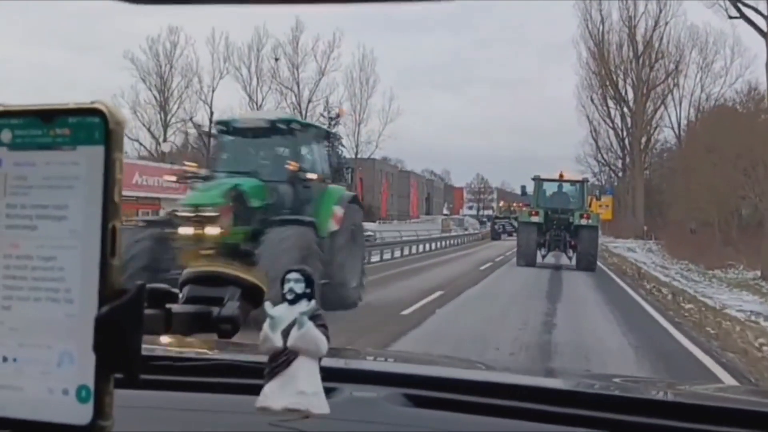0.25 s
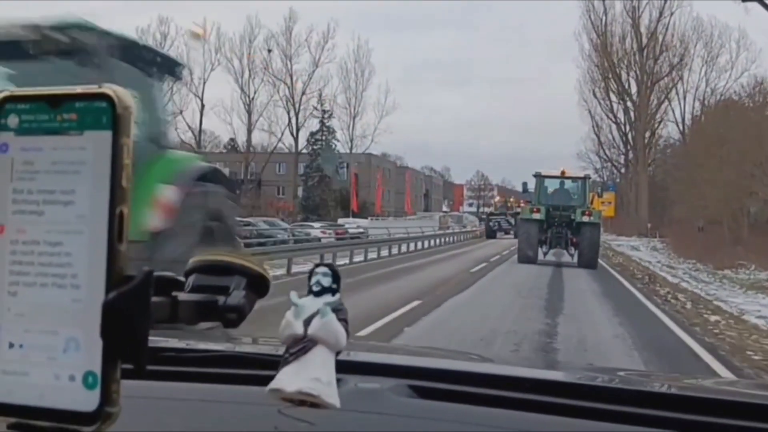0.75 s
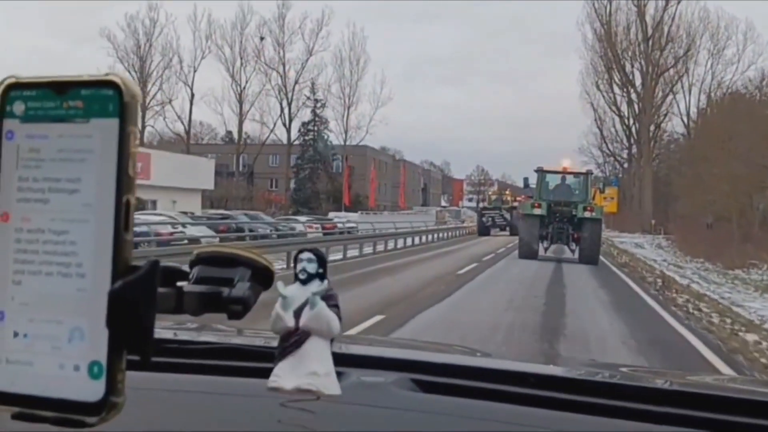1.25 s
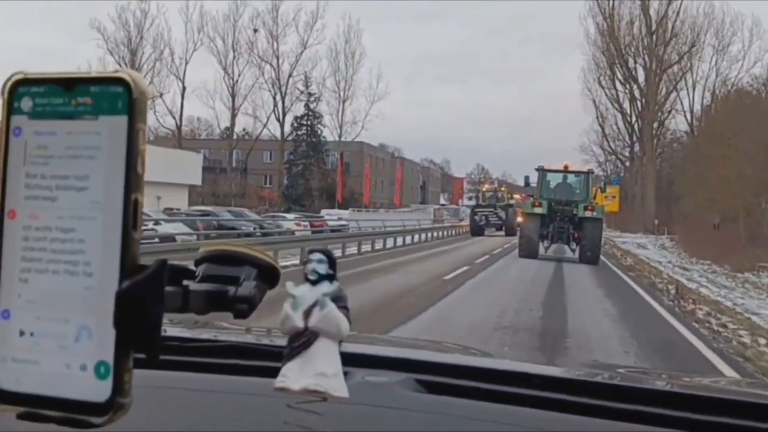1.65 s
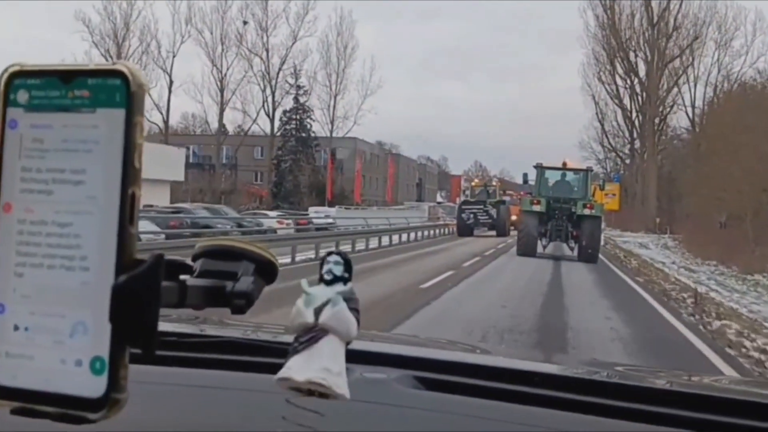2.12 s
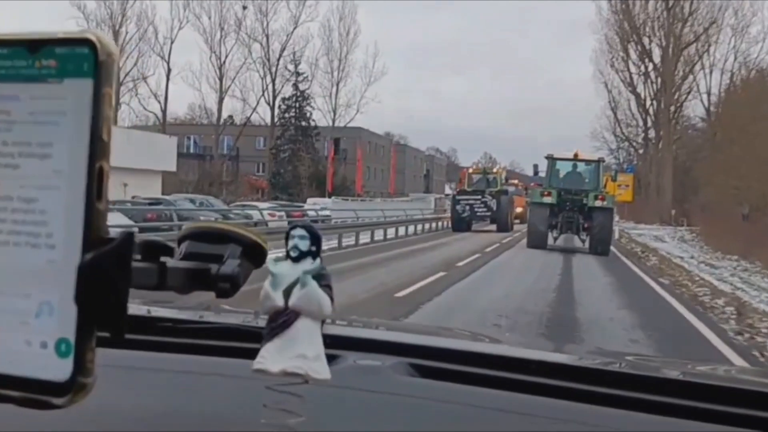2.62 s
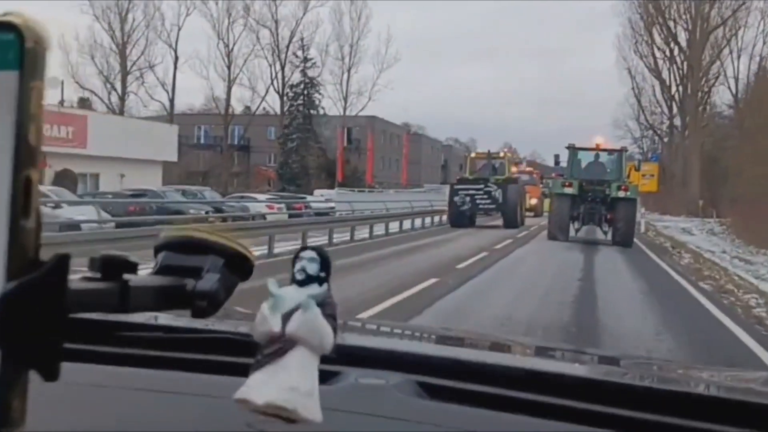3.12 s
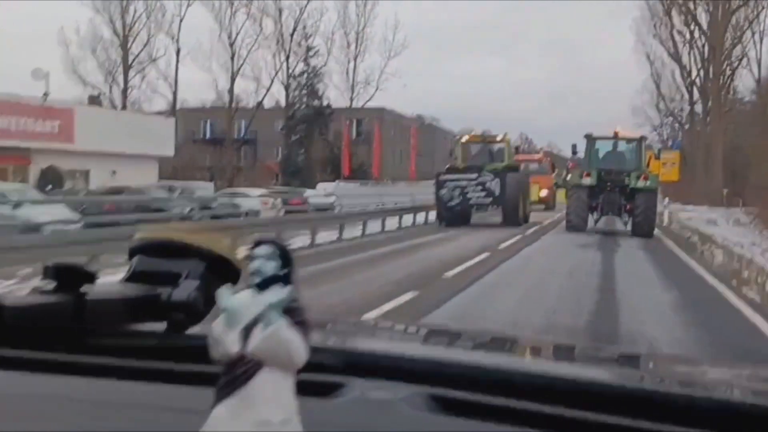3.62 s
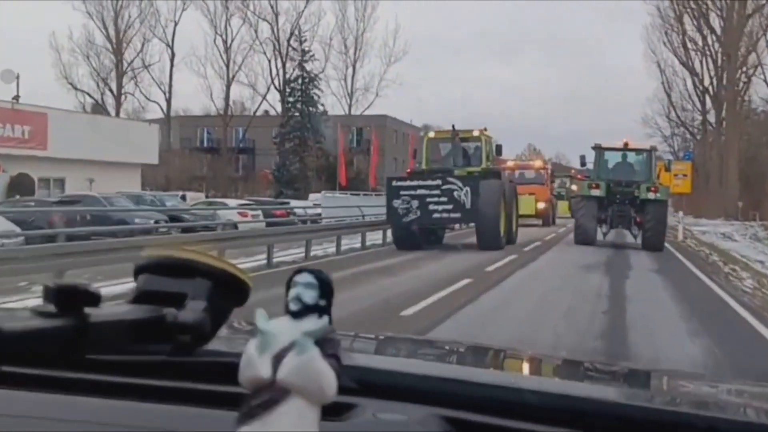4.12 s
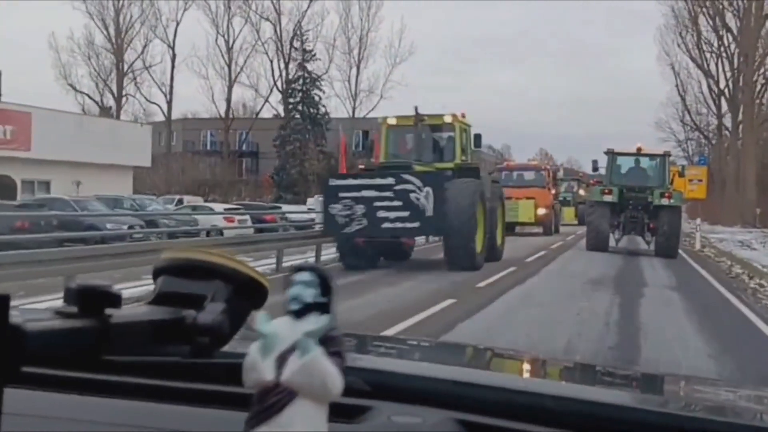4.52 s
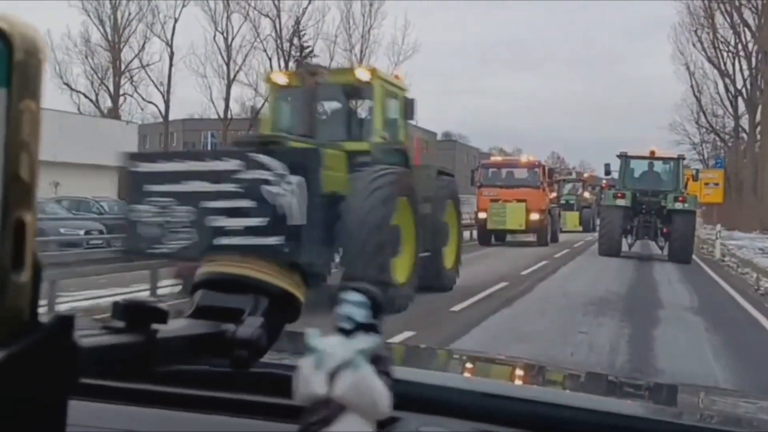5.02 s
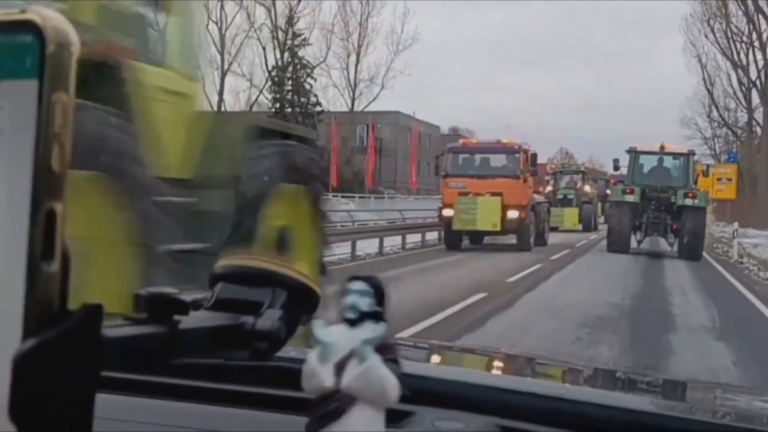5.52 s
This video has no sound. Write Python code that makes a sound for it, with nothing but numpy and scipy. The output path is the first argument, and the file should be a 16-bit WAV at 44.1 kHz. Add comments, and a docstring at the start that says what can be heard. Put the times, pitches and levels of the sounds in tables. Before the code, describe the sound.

The microphone sits inside a slow car on a town road. Throughout, a very deep engine boom throbs and creeps slightly upward, with dark road rumble, faint hiss and an uneven tyre hum pulsing about twice a second. A very faint falling whistle and tiny high squeaks open the clip. At about 0.6 s the driver presses the horn: one continuous, reedy, mid-pitched blast, held almost constant until 3.7 s. Its treble shimmers, dulling around 1.5 and 2.5 s, and a blurred, slightly sharper echo comes back from ahead. A tractor's airy roar peaks around 0.9-1.5 s, with a faint trim buzz near 0.8-1.3 s. A small tick falls at 3.5 s. The horn stops abruptly, its echo fading within a fraction of a second. Low rumble remains; engine and tyre hum grow from 4.5 s, with small high squeaks, and another tractor passes from 5 s with rough growl and faint gear whine.

```python
"""Inside a slow car on a town road: the engine booms and throbs, the tyres hum and rumble, tractors pass.
Engine and tyre tones are wavering sine waves; road and traffic are shaped noise, with short high tones, a tick
and a rattle. The driver holds the horn for three seconds: a stack of overtones reaches the cabin directly,
fading in and out. It also comes back from things ahead as a smeared echo, raised in pitch because the car is
closing on them."""
import sys
import numpy as np
from scipy import signal
from scipy.io import wavfile
from scipy.ndimage import uniform_filter1d

SR = 44100
rng = np.random.default_rng(int(sys.argv[2]) if len(sys.argv) > 2 else 0)


def put_to_file(sound):
    """Save the sound as 16-bit audio at rate SR, in the file named by the first command-line argument."""
    columns = np.atleast_2d(sound).T  # one column per channel
    safe = np.clip(columns, -1, 1)
    whole_steps = np.round(safe * 32767)
    wavfile.write(sys.argv[1], SR, whole_steps.astype(np.int16))


N = 253575

HORN_ON_S, HORN_OFF_S = 0.563, 3.707
HORN_HZ, HORN_RISE_HZ_PER_S = 305.95, .15


def from_db(db):
    """Turn decibels into a multiplier for the wave."""
    return 10 ** (np.asarray(db) / 20)


def rms_one(x):
    """Scale a signal so that its average strength (rms) is 1."""
    return x / np.sqrt(np.mean(x ** 2) + 1e-20)


def in_time(rows):
    """Join the points of a table by straight lines: one value a sample for each column after the time."""
    s, *columns = np.transpose(rows)
    return [np.interp(np.arange(N) / SR, s, c) for c in columns]


def at_hz(points, hz):
    """Read a table of (pitch, value) at any pitch, on a logarithmic pitch axis."""
    table_hz, values = np.array(points).T
    return np.interp(np.log(hz), np.log(table_hz), values)


def drift(rate):
    """Slow random wandering of spread 1: coarse noise smoothed twice; a higher rate in Hz wanders faster."""
    r = np.exp(-128 * np.pi * rate / SR)  # one coarse step is 64 samples
    noise = rng.standard_normal(N // 64 + 1002)
    slow = signal.lfilter([1], [1, -2 * r, r * r], noise)[1000:]
    return np.interp(np.arange(N) / 64, np.arange(len(slow)), rms_one(slow - slow.mean()))


def turns(hz):
    """Add up a pitch curve into the running angle of its wave, in radians."""
    return 2 * np.pi * np.cumsum(hz) / SR


def gate(on, off, rise, fall):
    """Switch a sound on and off with a straight rise and fall, all in seconds."""
    return np.interp(np.arange(N) / SR, [on, on + rise, off, off + fall], [0, 1, 1, 0])


def smooth_patches(shape, steps):
    """Random patches of spread 1 over pitch and time: noise averaged over 5 pitch bins and some time steps."""
    patches = uniform_filter1d(rng.standard_normal(shape), size=5, axis=-2)
    return rms_one(uniform_filter1d(patches, size=steps, axis=-1))


def coloured_noise(spectrum, patchy_db):
    """Stereo noise of rms 1 shaped over pitch, while narrow patches of it murmur up and down."""
    # how alike the two sides are: pitch_hz, likeness (0 to 1)
    likeness = [(40, 0.86), (130, 0.73), (300, 0.89), (700, 0.45), (2000, 0.19), (9000, 0.06)]
    # balance of the two sides: pitch_hz, left_minus_right_db
    lean = [(60, -6.5), (110, 4.5), (190, 3), (340, -0.5), (610, -3.5), (1090, 2), (1940, 6), (3460, 2),
            (6170, 7.5), (11000, -1)]
    noise = rng.standard_normal((2, N + 4096))
    hz, _, (mid, side) = signal.stft(noise, SR, nperseg=2048, noverlap=1536)
    hz = np.maximum(hz, 1)[:, None]
    patches = smooth_patches(mid.shape, 6)
    alike, lean_db = np.clip(at_hz(likeness, hz), 0, 1), at_hz(lean, hz) / 2
    common, apart = np.sqrt(1 + alike) * mid, np.sqrt(1 - alike) * side
    left = (common + apart) * from_db(lean_db)
    right = (common - apart) * from_db(-lean_db)
    gain = from_db(at_hz(spectrum, hz) + patchy_db * np.clip(patches, -3, 2.3))
    sound = signal.istft(gain * np.array([left, right]), SR, nperseg=2048, noverlap=1536)[1]
    return rms_one(sound[:, 2048:N + 2048])


def hum(rows, waver_db, waver_rad):
    """A sine wave on a pitch and level curve, unsteady in level and phase."""
    hz, level_db = in_time(rows)
    level = np.sqrt(2) * from_db(level_db + waver_db * drift(0.98))
    return level * np.sin(turns(hz) + waver_rad * drift(1.46))


def engine():
    """Boom at the firing rate, a tone at twice that rate, and a fading drone that beats with the boom."""
    # boom of the firing cylinders: start_s, firing_pitch_hz, level_db
    boom_curve = [(0, 36.4, -22), (.5, 37.2, -21.5), (1, 37.7, -21.5), (2.2, 38, -20.5), (3.7, 38.3, -19.5),
                  (4.2, 38.8, -18.5), (4.45, 39, -20), (4.85, 39.2, -17), (5.05, 39.3, -19),
                  (5.4, 39.6, -16.5), (5.75, 40, -18)]
    second_db = -31.5
    drone_hz, drone_db = 43.17, -28.5
    fade_start_s, fade_db_per_s = 1.3, 13
    in_step_s = 1.19  # a moment when boom and drone add up
    hz, boom_db = in_time(boom_curve)
    firing, t = turns(hz), np.arange(N) / SR
    boom = from_db(boom_db + 0.59 * drift(1.0)) * np.sin(firing)
    second = from_db(second_db + 1.9 * drift(6.4)) * np.sin(2 * firing + 0.47 * drift(1.0))
    fading_db = drone_db - fade_db_per_s * np.maximum(t - fade_start_s, 0)
    drone_phase = firing[round(in_step_s * SR)] + 2 * np.pi * drone_hz * (t - in_step_s)
    drone = from_db(fading_db) * np.sin(drone_phase)
    return np.sqrt(2) * (boom + second + drone)


def body_hum():
    """A low, wavering hum of the car body, as one unsteady sine wave."""
    # start_s, pitch_hz, level_db before its wavering
    hum_curve = [(0, 63.5, -52), (1.2, 62, -32), (2.7, 62.38, -39), (3.6, 61.93, -39), (4.3, 62.5, -39.5),
                 (4.8, 61.65, -28), (5.75, 56.2, -45)]
    return hum(hum_curve, 6.5, 0.9)


def tyre():
    """An uneven hum that swells once a beat; the beat slows a little."""
    # start_s, pitch_hz, level_db before the beat
    tyre_curve = [(0, 163, -29), (.9, 159.9, -36), (1.6, 149.9, -32), (2.4, 143.3, -31.5),
                  (3.4, 134.8, -30.5), (4.2, 131.8, -29.5), (4.7, 129, -26), (5.1, 129.5, -25),
                  (5.75, 129.7, -32)]
    beat_s, beat_depth, loud_s = .44, 0.41, 4.62  # loud_s is one of the loud moments
    slowing = .02  # beats per second squared
    t = np.arange(N) / SR - loud_s
    beat = 1 + beat_depth * np.cos(2 * np.pi * (t / beat_s - slowing * t ** 2))
    return hum(tyre_curve, 1.5, 1) * beat * (1 + .4 * drift(10))


def road():
    """Low rumble and fainter hiss of the road, both as shaped noise."""
    # colour of the rumble: pitch_hz, relative_level_db
    rumble_colour = [(20, -37), (32, -2), (52, -6.5), (66, -18), (95, -2), (120, -12.5), (135, 0),
                     (172, -3), (195, -12.5), (245, -20), (345, -24.5), (500, -48.5), (700, -85)]
    # loudness of the rumble: start_s, level_db
    rumble_level = [(0, -27), (1, -26), (2, -26), (3.5, -26.5), (4.6, -27), (5.75, -25)]
    # colour of the hiss: pitch_hz, relative_level_db
    hiss_colour = [(150, -21.5), (250, -11.5), (344, 1), (373, -10.5), (506, -13.5), (565, -22.5),
                   (857, -25.5), (929, -13), (1260, -38.5), (1680, -38), (3080, -45), (3680, -39),
                   (4320, -54), (7800, -45.5), (11500, -58.5), (13000, -63.5), (15500, -70.5),
                   (22000, -120)]
    hiss_db = -44
    rumble_db = in_time(rumble_level)[0] + 1.0 * drift(3.3)
    rumble = from_db(rumble_db) * coloured_noise(rumble_colour, patchy_db=-0.5)
    return rumble + from_db(hiss_db) * coloured_noise(hiss_colour, patchy_db=3.5)


def tractors():
    """Tractors passing: a roar of shaped noise, a whine of gear noise and a rough growling band."""
    # colour of the roar: pitch_hz, relative_level_db
    roar_colour = [(180, -37), (300, -14), (336, -14.5), (393, -4.5), (656, -11.5), (937, -16.5),
                   (1540, -23), (1730, -23.5), (3100, -37), (3420, -35.5), (4400, -41.5), (9000, -51),
                   (11700, -80.5), (19800, -120)]
    # loudness of the roar: start_s, level_db
    passing = [(0, -48), (.25, -47), (.5, -49), (.9, -41), (1.2, -41.5), (1.55, -42.5), (2, -51.5),
               (4.98, -56), (5.1, -47.5), (5.3, -48.5), (5.45, -49), (5.58, -43), (5.75, -44)]
    # gear whine: start_s, pitch_hz, level_db
    whine_curve = [(5.02, 1685, -80), (5.07, 1690, -60), (5.15, 1700, -69), (5.27, 1720, -58),
                   (5.35, 1730, -72.5), (5.48, 1745, -77), (5.55, 1765, -60), (5.68, 1765, -69),
                   (5.75, 1765, -75)]
    # rough band in the roar: start_s, pitch_hz, level_db
    growl_curve = [(4.8, 965, -79), (4.88, 930, -58.5), (4.97, 904, -71), (5.1, 1010, -58.5),
                   (5.28, 903, -71), (5.36, 856, -52), (5.45, 900, -52), (5.53, 930, -47), (5.62, 896, -51),
                   (5.7, 952, -58), (5.75, 970, -64)]
    # fast drift roughens each sine wave into a narrow band of noise
    whine = hum(whine_curve, 3, 0) * drift(40)
    growl = hum(growl_curve, 3, 0) * drift(60)
    growl *= np.arange(N) > growl_curve[0][0] * SR  # silent before its first row
    roar_db = in_time(passing)[0] + 1.4 * drift(11)
    return whine + growl + from_db(roar_db) * coloured_noise(roar_colour, patchy_db=5.5)


def whistle():
    """A faint falling whistle, stronger on the left: a sine wave roughened by drift."""
    # start_s, pitch_hz, level_db midway between the sides
    whistle_curve = [(0, 3430, -69), (.2, 3365, -70), (.24, 3350, -90)]
    return hum(whistle_curve, 1.5, .3) * drift(12) * from_db([[4], [-4]])


def short_tones():
    """Short high tones that start softly and die away: sine waves with a falling level."""
    # start_s, level_db from which it dies away, pitch_hz
    tone_list = [(.258, -62, 5850), (0.506, -60, 5950), (4.482, -56, 3613), (4.753, -57, 3620),
                 (5.111, -56, 3637), (5.147, -58, 3790), (5.21, -56, 3900), (5.418, -60, 3806)]
    fall_60_db_s = 0.091
    out = np.zeros(N)
    for s, peak_db, hz in tone_list:
        start = round(s * SR)
        age = np.arange(min(SR // 4, N - start)) / SR
        level = from_db(peak_db - 60 * age / fall_60_db_s) * (1 - np.exp(-age / 0.0013))
        out[start:][:len(age)] += level * np.sin(2 * np.pi * hz * age)
    return out


def horn_pitch():
    """The horn creeps up in pitch while it is held."""
    return HORN_HZ + HORN_RISE_HZ_PER_S * (np.arange(N) / SR - HORN_ON_S)


def swelling_db(hz):
    """Level change in time of the overtone at hz, left and right: the treble level plus nearby swells."""
    # level of the horn's treble: start_s, level_db
    treble_level = [(.6, 2), (.8, 1), (1.1, -3.5), (1.48, -8), (1.8, 3.5), (1.95, 7.5), (2.18, 9),
                    (2.48, -15), (2.85, -.5), (3.1, 4), (3.35, 0), (3.6, 5.5), (3.72, 8)]
    # narrow swells and dips: middle_s, half_length_s, centre_hz, half_width_octaves, left_db, right_db
    swells = [(0.7, 0.2, 3060, 0.02, -9, -11), (0.8, 0.2, 1224, 0.02, -4, 9),
              (0.9, 0.13, 612, 0.02, -9, -2), (0.9, 0.13, 918, 0.02, -9, 7), (0.9, 0.45, 3977, 0.14, 5, -8),
              (0.9, 0.45, 4589, 0.02, 5, 1), (0.95, 0.45, 5813, 0.14, 15, 12),
              (1.1, 0.13, 3671, 0.02, -11, -7), (1.25, 0.08, 4589, 0.14, 7, 9),
              (1.25, 0.2, 2142, 0.14, 0, -13), (1.3, 0.2, 1836, 0.02, -13, 14),
              (1.35, 0.3, 612, 0.02, -10, -10), (1.5, 0.13, 4589, 0.14, -10, -10),
              (1.6, 0.08, 918, 0.02, -9, -7), (1.65, 0.08, 612, 0.14, -14, -2),
              (1.65, 0.45, 7037, 0.07, -14, -4), (1.85, 0.08, 2754, 0.02, -12, -8),
              (1.85, 0.13, 918, 0.14, -7, 2), (1.92, 0.2, 3365, 0.02, 5, 6), (2.0, 0.13, 6119, 0.14, 9, 8),
              (2.0, 0.45, 5201, 0.02, -6, -13), (2.05, 0.13, 9178, 0.14, -15, -12),
              (2.05, 0.2, 3671, 0.02, -19, -13), (2.05, 0.3, 1836, 0.14, 11, 12),
              (2.1, 0.08, 7649, 0.14, -19, -11), (2.1, 0.2, 3060, 0.02, -25, -10),
              (2.3, 0.08, 8567, 0.14, 14, 15), (2.35, 0.2, 1224, 0.02, -13, -9),
              (2.38, 0.08, 4589, 0.14, -9, -8), (2.4, 0.3, 918, 0.14, 3, -14),
              (2.5, 0.3, 2142, 0.14, 11, 13), (2.7, 0.13, 1836, 0.14, 2, 13),
              (2.85, 0.13, 2754, 0.14, -10, 9), (2.95, 0.13, 1224, 0.02, 5, -10),
              (3.0, 0.3, 3365, 0.02, -11, -8), (3.05, 0.08, 4895, 0.02, -16, 5),
              (3.05, 0.08, 5201, 0.14, 13, 12), (3.05, 0.13, 4283, 0.14, -14, 5),
              (3.15, 0.13, 3977, 0.02, -1, -16), (3.2, 0.13, 2142, 0.02, -15, -10),
              (3.2, 0.2, 1224, 0.02, 8, 5), (3.2, 0.2, 1530, 0.02, -13, 1), (3.2, 0.2, 7343, 0.14, -9, -9),
              (3.4, 0.13, 5201, 0.07, -14, -2), (3.4, 0.45, 4589, 0.07, -11, -11),
              (3.45, 0.13, 3060, 0.02, -9, -13), (3.45, 0.3, 918, 0.02, -17, 9),
              (3.55, 0.08, 3977, 0.02, -12, -16), (3.55, 0.13, 2754, 0.14, -15, -14),
              (3.65, 0.13, 5201, 0.02, -3, 14), (3.65, 0.2, 5507, 0.02, 16, -8)]
    treble_from_hz, treble_full_hz = 2000, 2600
    low_overtones_db = .5
    bright = np.clip((hz - treble_from_hz) / (treble_full_hz - treble_from_hz), 0, 1)
    t = np.arange(0, N + 256, 256) / SR
    bumps = np.zeros((2, len(t)))
    for s, half, centre, octaves, *sides_db in swells:
        bump = np.exp(-((t - s) / half) ** 2 - (np.log2(hz / centre) / octaves) ** 2)
        bumps += np.outer(sides_db, bump)
    overall_db = bright * in_time(treble_level)[0] + (1 - bright) * low_overtones_db
    return [overall_db + np.interp(np.arange(N) / SR, t, side) for side in bumps]


def horn():
    """A pulse train built from its overtones; each reaches each side by its own slowly changing path."""
    # overtones from the second up: left_db, right_db, left_lead_radians (levels before fading and swells)
    overtones = [(-44, -45, -2.3), (-39, -51, 2.8), (-50, -56, 1.2), (-49, -60, -0.5), (-66, -68, -0.3),
                 (-59, -60, 0.0), (-60, -64, 0.7), (-57, -67, 3.0), (-55, -64, -2.1), (-59, -60, -0.0),
                 (-61, -61, 1.8), (-60, -59, -2.2), (-59, -62, 2.2), (-60, -63, 1.2), (-65, -70, -2.3),
                 (-61, -69, 1.0), (-78, -77, -0.4), (-77, -84, 2.5), (-78, -88, 0.0), (-83, -97, 2.9),
                 (-77, -94, -0.3), (-73, -94, 2.1), (-66, -84, -2.2), (-63, -88, 1.2), (-66, -91, 2.6),
                 (-69, -91, -3.1), (-74, -88, -0.1), (-79, -88, 1.8), (-82, -88, -0.8), (-89, -85, -1.9),
                 (-94, -81, 0.2)]
    fade_limit_db, flutter_limit_db = 1.5, 4  # greatest spread of the slow fading and of the fast flutter
    release_s, stops_early_s = 0.012, 0.00065  # higher overtones tend to let go sooner
    phase, out = turns(horn_pitch()), np.zeros((2, N))
    for k, (left_db, right_db, lead) in enumerate(overtones, start=2):
        group_db = swelling_db(k * HORN_HZ)
        shared = k * phase + rng.normal(0, 0.95) + 0.43 * drift(3.4)
        # short waves fade and flutter more deeply
        fade_db = np.clip(.4 * (k - 3), .5, fade_limit_db) * drift(2.5)
        rise_s = .1 if 5 < k < 23 else .03  # the middle overtones bloom late
        off_s = HORN_OFF_S - stops_early_s * k * rng.exponential()
        blown = gate(HORN_ON_S, off_s, rise_s, release_s)
        for ch, (side_db, side_rad) in enumerate([(left_db, lead), (right_db, 0)]):
            flutter_db = min(.3 * k, flutter_limit_db) * np.clip(drift(14), -3, 1.5)
            wander = min(.05 * k, .5) * drift(1.5)
            level = from_db(side_db + group_db[ch] + fade_db + flutter_db)
            out[ch] += blown * level * np.sin(shared + side_rad + wander)
    return np.sqrt(2) * out


def patchy(x, patchy_db):
    """Narrow regions of a stereo sound swell and dip briefly, on each side by themselves."""
    spectra = signal.stft(x, SR, nperseg=1024)[2]
    patches = smooth_patches(spectra.shape, 8)
    gain = from_db(patchy_db * (np.minimum(patches, 1.6) - 1))
    return signal.istft(spectra * gain, SR, nperseg=1024)[1][:, :N]


def echo(count=14):
    """Reflectors at many ranges and bearings each return the horn late, raised by twice the closing speed."""
    # start_s, closing_speed_m_per_s, level_db common to all reflectors, extra_treble_db
    echo_curve = [(.6, 5, -59.5, -7), (1.15, 4.9, -64.5, -3.5), (1.8, 4.48, -58.5, -18.5),
                  (2.25, 4.52, -59.5, -13), (2.58, 4.55, -59, -12.5), (2.75, 4.3, -57.5, -5),
                  (3.05, 3.77, -59, -2.5), (3.7, 3.07, -54.5, -5.5), (3.85, 3.4, -69.5, -0.5),
                  (3.93, 4.55, -66.5, 0.5), (4.1, 4.3, -63, -6)]
    # strength of the horn's overtones in the echo: pitch_hz, level_db
    echo_colour = [(600, 3.5), (930, -4), (1250, -2), (1570, -3.5), (1890, -17.5), (2200, -3.5), (3100, -6),
                   (4300, -7.5), (5300, -15.5), (6400, -23), (8000, -10.5), (10000, -25.5)]
    # added for the far reflectors: pitch_hz, extra_db
    far_colour = [(600, 0), (930, 10.5), (1600, 8), (2300, 0), (5500, 1.5), (7000, 13.5), (10000, 7.5)]
    sound_speed = 343  # metres per second
    loss_db_per_s = 14  # later echoes come from farther away and are weaker
    middle_db, middle_follows = 1.5, 0.35  # the middle overtones follow a share of the treble
    speed, level_db, treble_db = in_time(echo_curve)
    pitch, out = horn_pitch(), np.zeros((2, N))
    k, cycle = np.arange(2, 38)[:, None], np.linspace(0, 2 * np.pi, 2049)
    hz = k * pitch.mean()
    middle_gain = from_db(middle_db + middle_follows * treble_db)
    high_gain = from_db(treble_db) * from_db([[0], [-7]])  # the right side is duller
    for n in range(count):
        near = n < count // 2  # a tight group nearly straight ahead, the rest far and aside
        facing = 1 - rng.uniform(0, .12 if near else .7)  # share of the closing speed
        delay = rng.uniform(.07, .1) if near else rng.uniform(.1, .25)
        raised = pitch * (1 + 2 * facing * speed / sound_speed)
        phase = (turns(raised) + (.03 if near else .13) * drift(25)) % (2 * np.pi)
        colour_db = at_hz(echo_colour, hz) + (0 if near else at_hz(far_colour, hz))
        colour_db = colour_db + rng.normal(0, 3.94, k.shape)
        # one cycle of the horn's wave, read along the running phase in three bands of overtones
        shape = from_db(colour_db) * np.sin(k * cycle + rng.uniform(0, 2 * np.pi, k.shape))
        bands = np.split(shape, [6, 18])
        low, middle, high = [np.interp(phase, cycle, band.sum(0)) for band in bands]
        sound = low + middle_gain * middle + high_gain * high
        pan = np.array([[1.], [.3]]) if n % 2 else np.array([[.3], [1.]])
        heard = gate(HORN_ON_S + delay, HORN_OFF_S + delay, 0.025, .04 if near else .16)
        out += heard * pan * sound * from_db(-loss_db_per_s * (delay - 0.0188))
    # narrow regions of the whole echo swell and dip at random on each side
    return from_db(level_db) * patchy(out, patchy_db=6)


def rattle():
    """Trim buzzing as a tractor passes: uneven soft taps ring two thin resonances."""
    # start_s, level_db before halving and panning
    rattle_level = [(.78, -90), (.84, -72), (1.13, -71), (1.2, -78), (1.35, -95)]
    modes_hz, fall_60_db_s, taps_per_s = (5870, 5800), 0.045, 34
    tap_count = np.floor(turns(taps_per_s * (1 + .3 * drift(20))) / (2 * np.pi))
    taps = np.diff(tap_count, prepend=0)
    r, out = from_db(-60 / (fall_60_db_s * SR)), 0
    for hz in modes_hz:
        mode = [1, -2 * r * np.cos(2 * np.pi * hz / SR), r * r]
        uneven = taps * from_db(rng.normal(0, 3, N)) + 1e-18
        # two passes make each tap swell before it dies away
        out = out + signal.lfilter([1], mode, signal.lfilter([1], mode, uneven))
    return from_db(in_time(rattle_level)[0]) * rms_one(out) / 2 * from_db([[2], [-2]])


def tick():
    """One small tick inside the cabin: a short burst of smoothed noise that dies away fast."""
    tick_s, start_db, fall_60_db_s = 3.512, -57, 0.069  # start_db is before smoothing
    age = np.maximum(np.arange(N) / SR - tick_s, 0)
    noise = uniform_filter1d(rng.standard_normal((2, N)), size=3)
    return from_db(start_db - 60 * age / fall_60_db_s) * (age > 0) * noise


def scene():
    """Engine, road and traffic reach the left side a little late; horn and echo come by their own paths."""
    left_lag_s = 0.000803
    left, right = engine() + body_hum() + tyre() + road() + tractors() + short_tones()
    left = np.interp(np.arange(N) - round(left_lag_s * SR), np.arange(N), left)
    return np.array([left, right]) + whistle() + horn() + echo() + rattle() + tick()


def record(dry):
    """Cut the top of the treble with a steep low-pass filter."""
    cutoff_hz = 15400
    return signal.sosfilt(signal.cheby2(12, 60, cutoff_hz, fs=SR, output="sos"), dry)


dry = scene()
out = record(dry)
put_to_file(out)
```